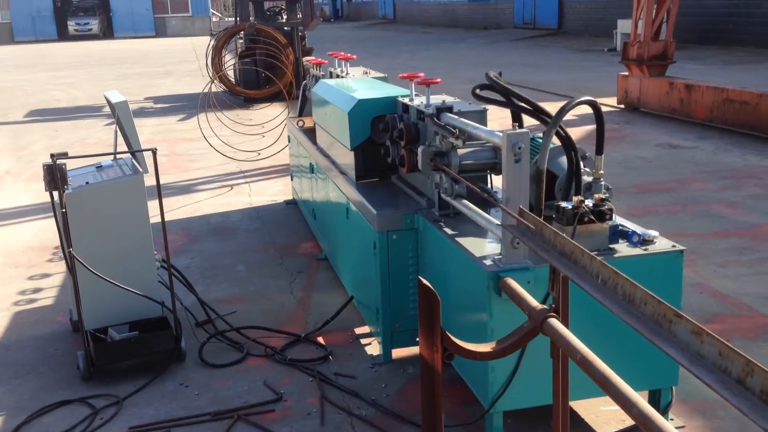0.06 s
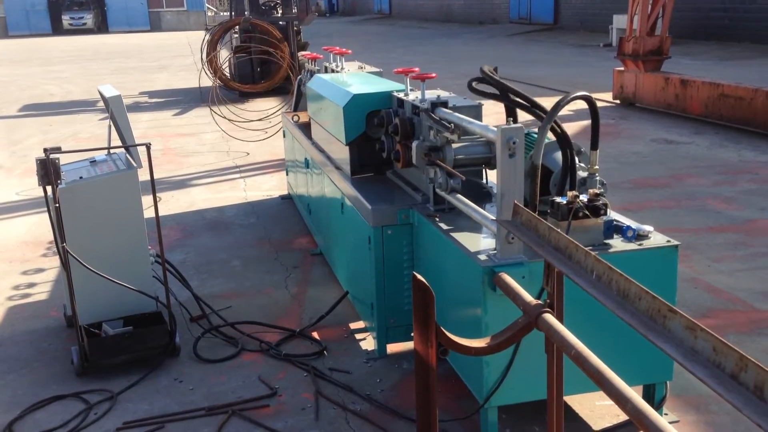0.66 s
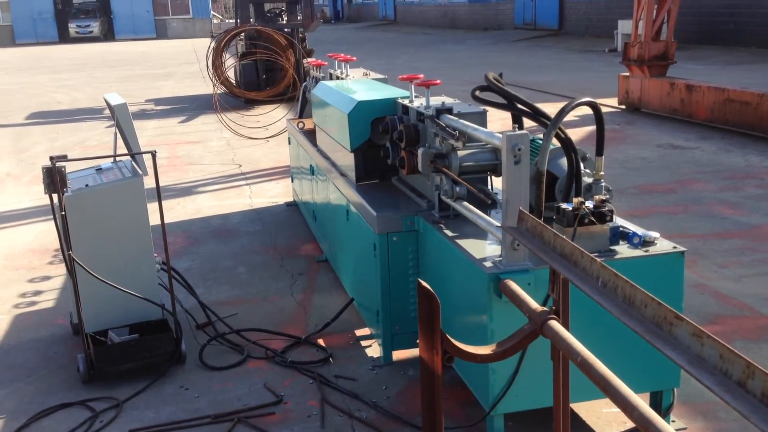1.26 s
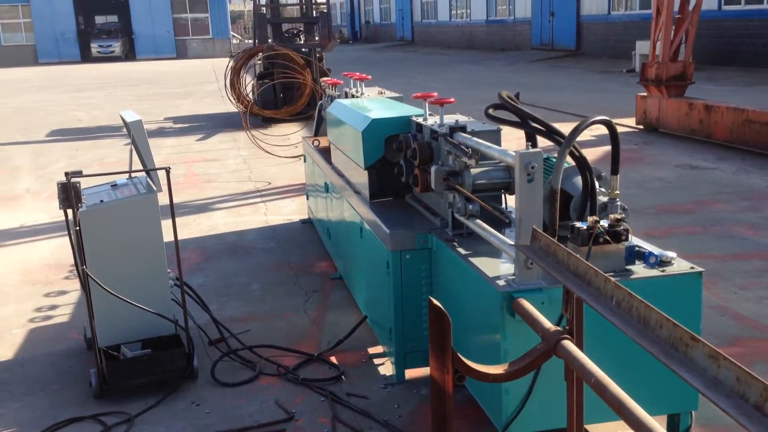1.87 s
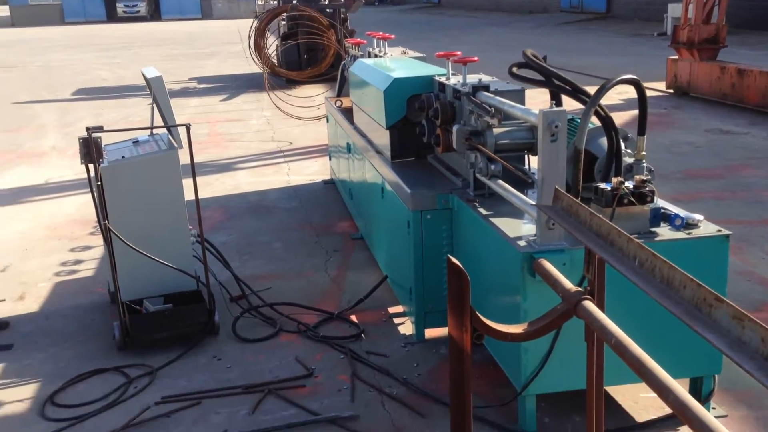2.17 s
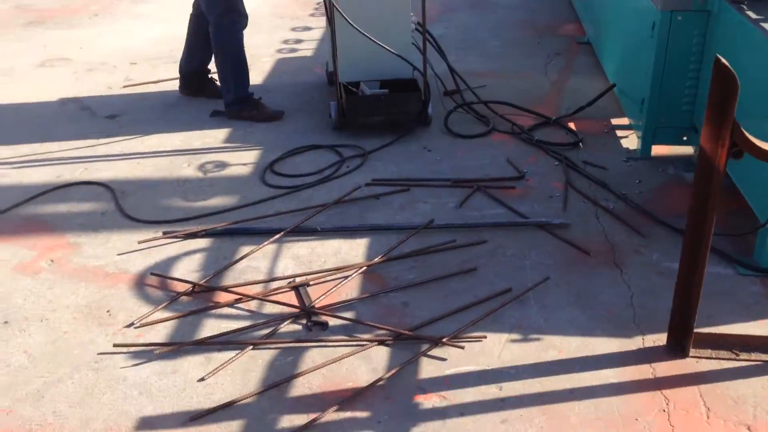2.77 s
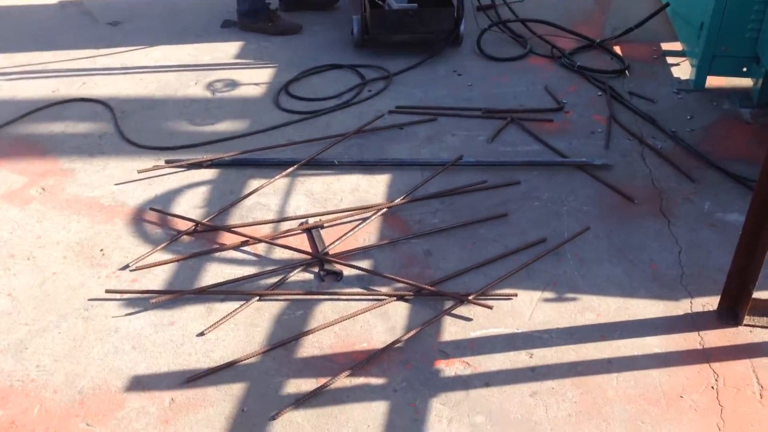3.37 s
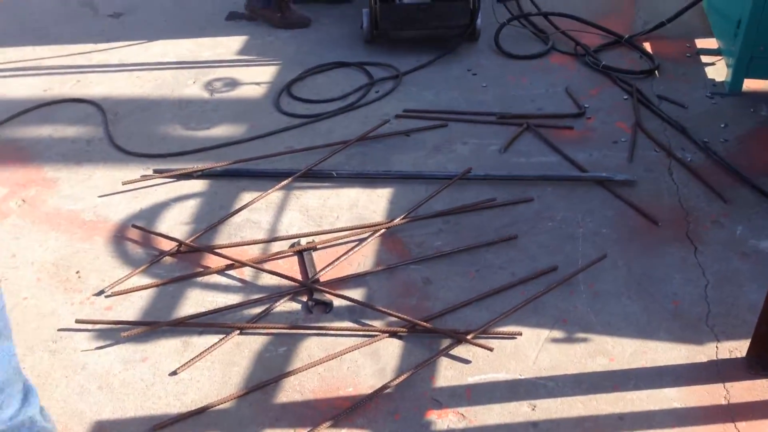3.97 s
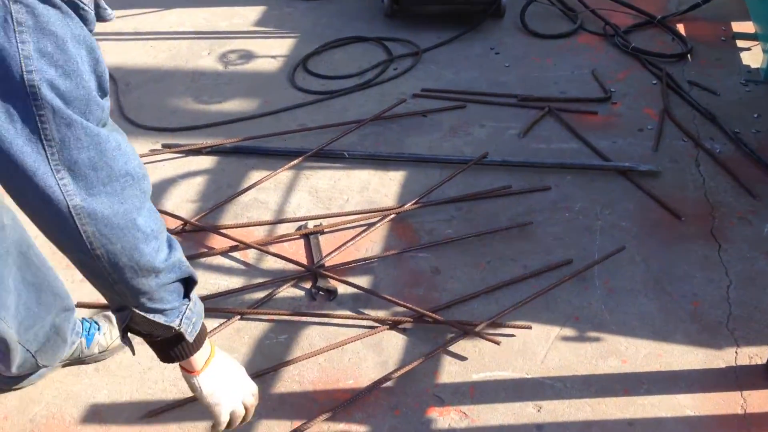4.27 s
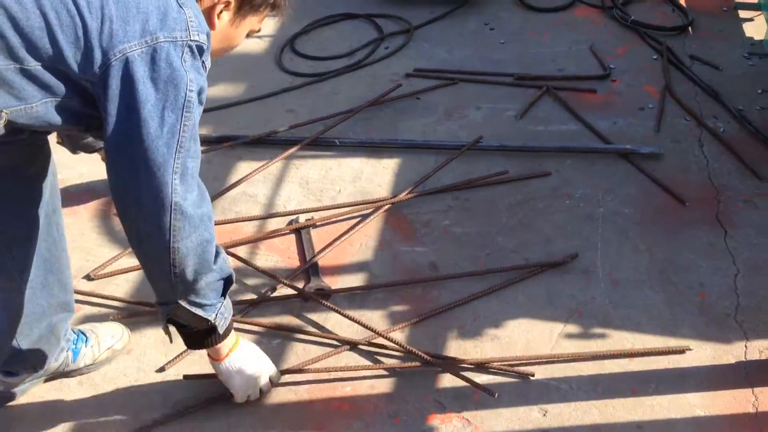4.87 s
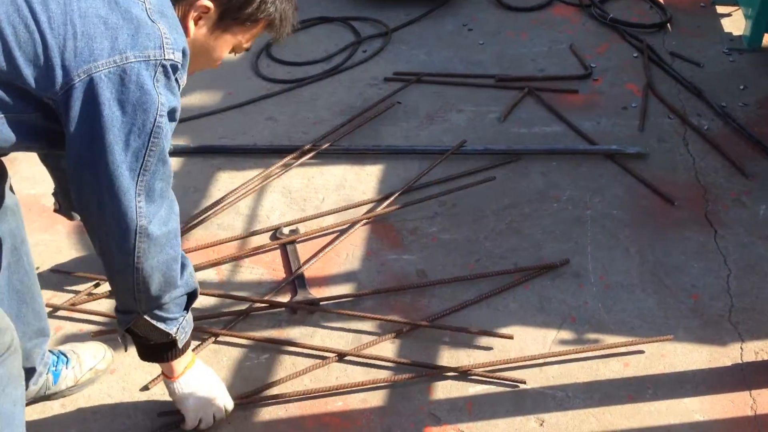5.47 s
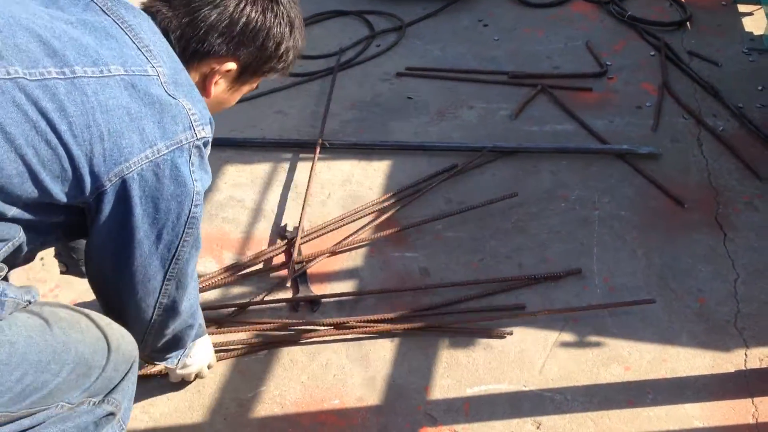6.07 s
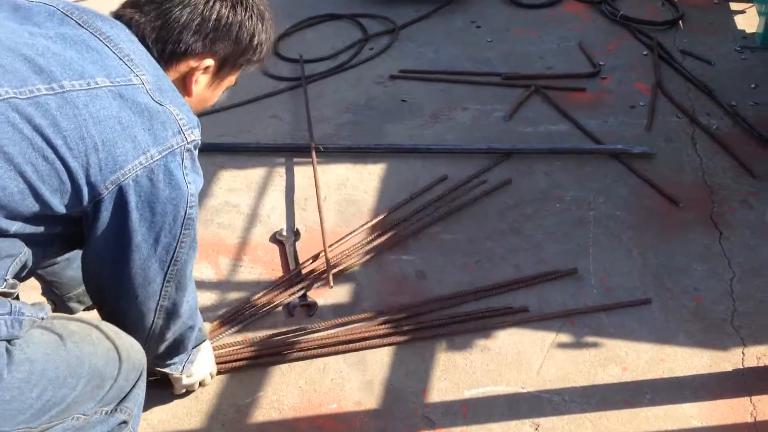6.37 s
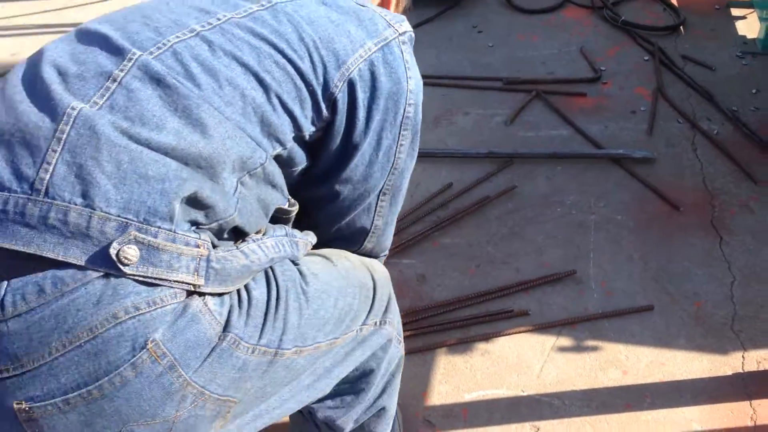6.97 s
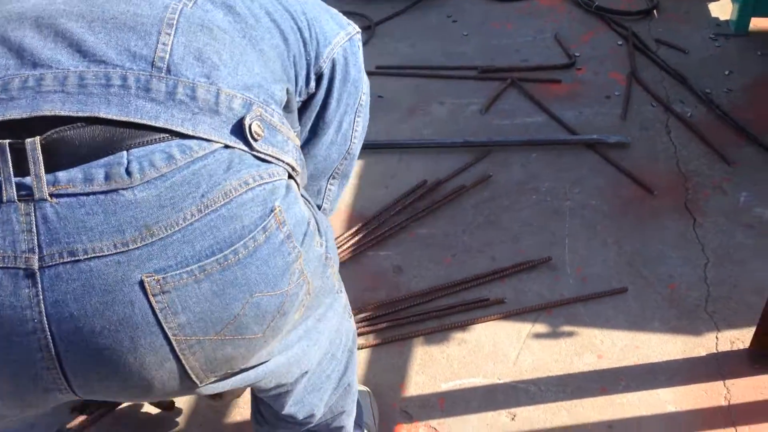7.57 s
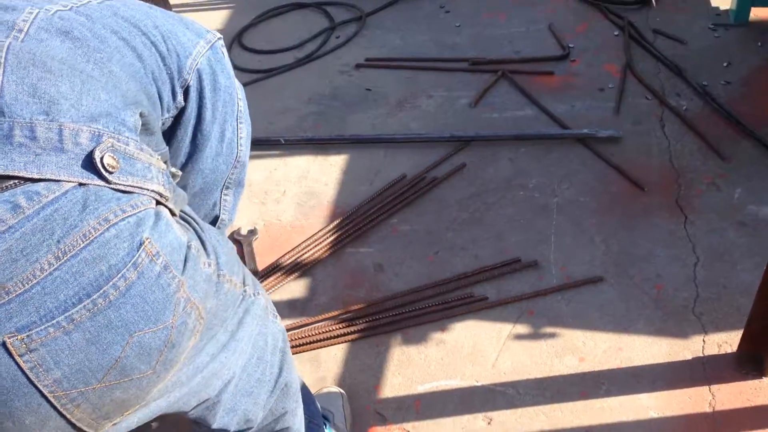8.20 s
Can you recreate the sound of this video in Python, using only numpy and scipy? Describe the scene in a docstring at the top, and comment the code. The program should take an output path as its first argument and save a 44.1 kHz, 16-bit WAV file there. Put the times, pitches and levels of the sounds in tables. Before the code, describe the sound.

A machine rattles steel wire through rollers and winds down, then metal rods clink, scrape and clatter on concrete amid wind gusts.

```python
"""An open concrete yard, one small microphone beside a rebar straightening and cutting machine.
Ribbed wire rattles in the rollers; after the cut the spinning head coasts to rest. The cut rod lands
and rolls, then a worker rakes the rods together and drops the bundle: every blow and every catch of
a rib rings the steel's bending modes. Shoes scuff on grit and gusts buffet the microphone.
Behind it all lie a low hum and the wash of distant works."""
import sys
import numpy as np
from scipy import signal
from scipy.fft import rfft, irfft
from scipy.io import wavfile
from scipy.ndimage import uniform_filter1d, map_coordinates

SR = 44100
rng = np.random.default_rng(int(sys.argv[2]) if len(sys.argv) > 2 else 0)


def waveform_to_disk(signal):
    """Save audio, clipped to [-1, 1], as 16-bit WAV at the path in sys.argv[1]."""
    frames = np.transpose(np.atleast_2d(signal))
    scaled = np.clip(frames, -1, 1) * 32767
    samples = np.round(scaled).astype(np.int16)
    wavfile.write(sys.argv[1], SR, samples)


N = 363384
TIME = np.arange(N) / SR
GRAZE_LEAD_S = .01  # a rod grazes this long before its main blow
FED, ROLLED, RAKED, DROPPED = range(4)  # how the steel lies
# moments from which the steel lies rolled, raked and dropped: t/s
POSITIONS_S = [3.3, 4.45, 7.3]


def amp(db):
    """Decibels to amplitude."""
    return 10 ** (np.asarray(db) / 20)


def unit(x):
    """Scale to rms 1."""
    return x / np.sqrt(np.mean(x ** 2) + 1e-20)


def curve(points):
    """Join (t/s, value) points by straight lines."""
    return np.interp(TIME, *np.transpose(points))


def add(track, s, sound):
    """Mix a sound in at time s."""
    start = max(int(s * SR), 0)
    track[start:start + len(sound)] += sound[:max(N - start, 0)]


def colour(x, points):
    """Shape a sound by (f/Hz, level/dB) points, falling off beyond both ends."""
    hz, db = np.transpose(points)
    f = np.maximum(np.fft.rfftfreq(len(x), 1 / SR), 1)
    skirts = np.minimum(f / hz[0], 1) ** 2 * np.minimum(hz[-1] / f, 1) ** 4
    return irfft(rfft(x) * skirts * amp(np.interp(np.log(f), np.log(hz), db)), len(x))


def resonate(x, hz, width):
    """One resonance, gain 1 at its centre."""
    return signal.lfilter(*signal.iirpeak(hz, max(hz / width, .5), fs=SR), x)


def split(x, hz, order=4):
    """The parts below and above a frequency."""
    return [signal.sosfilt(signal.butter(order, hz, side, fs=SR, output="sos"), x)
            for side in ("low", "high")]


def walk(rate):
    """Smooth random drift with a spread near 1 and `rate` new values a second."""
    step = int(SR / rate)
    return 1.2 * uniform_filter1d(np.repeat(rng.standard_normal(N // step + 1), step), step)[:N]


def contacts(size, rate, spread_db):
    """Tiny random impacts, `rate` a second; a wide spread makes a few much harder than the rest."""
    chance, force, hardness = rng.random(size), rng.standard_normal(size), rng.standard_normal(size)
    return (chance < rate / SR) * force * amp(spread_db * np.clip(hardness, -2, 2))


def steady(x, size=2000):
    """Hold the short-term rms at 1 and keep the fine grain."""
    return x / np.sqrt(np.abs(uniform_filter1d(x ** 2, size)) + 1e-12)


def swell(start, length, attack_s, release_db_per_s):
    """Attack, hold and release of one movement."""
    age = TIME - start
    return np.clip(age / attack_s, 0, 1) * amp(-release_db_per_s * np.maximum(age - length, 0))


def yard():
    """Distant works reach the microphone as a faint wavering wash."""
    # spectrum of the works: f/Hz, relative level/dB
    spectrum = [(18, -28), (30, -3.5), (75, 2.5), (307, -10), (518, -11.5), (656, -11), (874, -14),
                (1050, -15), (1910, -22.5), (6370, -31.5), (12900, -37), (15500, -38.5)]
    # their slow rise and fall: t/s, relative level/dB
    levels = [(0, -56.5), (2.6, -56), (4, -52), (5.3, -57), (6.6, -52.5), (8.24, -53.5)]
    wash = colour(rng.standard_normal(N), spectrum)
    above_rumble = split(wash, 300)[1]
    return wash / np.std(above_rumble) * amp(curve(levels) - 2.0 + 0.44 * walk(9))


def hum(hz=140, width=32):
    """A narrow band of noise hums low under everything."""
    # course of the hum: t/s, level/dB
    levels = [(0, -40), (1.5, -54), (2.6, -57), (4.2, -52), (5.2, -61), (8.24, -63)]
    band = resonate(resonate(rng.standard_normal(N), hz, width), hz, width)
    return amp(curve(levels)) * steady(band, size=8000)


def wind(breeze_db=-59.5, flutter_db=1.5):
    """Turbulence right on the microphone: stronger gusts are brighter, and single eddies thump."""
    # gusts: start t/s, length/s, relative level/dB
    gusts = [(1.922, 0.34, -49.5), (2.623, 0.074, -42), (2.695, 0.053, -35), (2.778, 0.097, -38),
             (3.046, 0.072, -37.5), (3.2, .1, -46.5), (3.386, 0.47, -46), (3.934, 0.31, -41.5),
             (4.523, .15, -37.5), (4.717, .16, -44.5), (4.935, .33, -42), (5.41, 0.092, -49),
             (5.77, 0.066, -42.5), (6.059, 0.552, -39.5), (7.219, 0.1, -42), (7.748, 0.084, -19.5),
             (7.85, 0.21, -28.5), (7.973, .2, -22.5), (8.12, 0.051, -18), (8.19, .05, -29)]
    # spectrum of the turbulence: f/Hz, relative level/dB
    spectrum = [(15, -50.5), (25, -11.5), (76, 4), (281, -3), (346, -7.5), (516, -6), (604, -8.5),
                (949, -24.5), (1230, -33.5), (1600, -35), (2080, -57), (3520, -120)]
    # eddies hitting the microphone: t/s, peak level/dB, half width/s
    eddies = [(2.727, -25.5, 0.00079), (2.811, -27, 0.0021), (2.851, -21.5, 0.0011), (2.866, -26, 0.00091),
              (3.11, -25, 0.001), (4.616, -22.5, 0.00073), (5.177, -20.5, 0.00083), (6.137, -25.5, 0.00066),
              (6.498, -28, 0.0019), (7.767, -14.5, 0.00041), (7.800, -4.5, 0.00039), (7.807, -7, 0.0006),
              (7.992, -10, 0.0007), (8.140, -15, 0.0018), (8.150, -23, 0.000082), (8.1525, -0.5, 0.00036)]
    swells = [amp(db) * swell(s, length, attack_s=0.015, release_db_per_s=499)
              for s, length, db in gusts]
    gust_db = 20 * np.log10(np.maximum(np.max(swells, axis=0), amp(breeze_db)))
    low, high = split(colour(rng.standard_normal(N), spectrum), 288, order=2)
    brightness = amp(np.minimum(0.75 * (gust_db + 10), 3))
    air = (low - brightness * high) * amp(6.9 * walk(70))
    out = steady(air) * amp(gust_db - 1.5 + flutter_db * walk(16))  # uneven puffs
    for s, db, half_width in eddies:
        passage = np.arange(-500, 500) / SR / half_width
        push_pull = -passage * np.exp((1 - passage ** 2) / 2)
        add(out, s - 500 / SR, amp(db) * push_pull)
    return split(out, 38, order=2)[1]  # slow pressure swings leak past the diaphragm


def shoes():
    """Grit crunches between sole and concrete in short swells."""
    # scuffs: t/s, half length/s, centre f/Hz, width/Hz, level/dB
    scuffs = [(2.503, 0.028, 915, 600, -54), (2.506, 0.02, 3180, 3000, -56.5),
              (3.262, 0.013, 1850, 250, -48), (5.994, 0.046, 810, 737, -42.5),
              (5.995, 0.027, 1830, 1300, -37), (6.151, .02, 3070, 2400, -32),
              (7.484, 0.028, 1760, 900, -38)]
    grit = contacts(N, rate=1800, spread_db=-3)
    out = np.zeros(N)
    for s, length, hz, width, db in scuffs:
        pressure = np.exp(-.5 * ((TIME - s) / length) ** 2)
        out += amp(db) * pressure * unit(resonate(resonate(grit, hz, width), hz, width))
    return out


def machine(spin_hz=87.3, cut_s=0.7, coast_s=1.9, loaded_db=-29, idle_s=1.6):
    """The spinning head beats the wire on its rollers; the knocks shake the frame and fade as it slows."""
    # the machine drops its load at the cut, then coasts to rest: t/s, relative level/dB
    run_down = [(0, -27.5), (.33, -26.5), (.62, -29), (.69, -35.5), (1.08, -35.5), (1.5, -40), (1.6, -46),
                (1.78, -44), (1.92, -57), (2.45, -75)]
    # resonances of the frame: f/Hz, width/Hz, relative level/dB
    frame_modes = [(141, 25, -0.5), (230, 63, 0.5), (312, 23, 4), (477, 72, -0.5), (598, 45, 2.5),
                   (695, 30, -2.5), (783, 45, -4.5), (1183, 50, -12), (1458, 33, -6.5), (1747, 280, -13.5)]
    # broad spectrum of the rumble: f/Hz, relative level/dB
    spectrum = [(18, -49), (30, -5.5), (135, 6.5), (177, 4.5), (472, 5), (510, 3), (764, -16), (944, -17.5),
                (1190, -11.5), (2780, -33), (3000, -17), (3900, -35.5), (6600, -120)]
    speed = spin_hz * np.exp(-np.maximum(TIME - cut_s, 0) / coast_s)
    turns = np.cumsum(speed * (1 + 0.011 * walk(31))) / SR
    knocks = contacts(N, rate=1600, spread_db=0) * (1 + 0.06 * np.cos(2 * np.pi * turns))
    frame = sum(amp(db) * resonate(knocks, hz, width) for hz, width, db in frame_modes)
    low, high = split(unit(colour(knocks, spectrum)) + amp(-3) * unit(frame), 1000)
    bass, rumble = split(low, 100)
    rumble_db = curve(run_down)
    fall_db = loaded_db - rumble_db
    idle_db = 59 * np.maximum(TIME - idle_s, 0)  # the rollers fall silent as the wire stops
    rollers = amp(-2.5 - .2 * fall_db - idle_db) * steady(high)
    shake = amp(-15 + .55 * fall_db) * steady(bass, size=6000)  # bass fades more slowly than the rumble
    running = np.clip((run_down[-1][0] - TIME) / .06, 0, 1)
    return running * amp(rumble_db - 1.5) * (shake + steady(rumble) + rollers)


def ring(hz, gain, t60, size=32768):
    """Impulse response of decaying modes; t60 holds at 5 kHz and higher modes die sooner."""
    t = np.arange(size, dtype=np.float32) / SR
    out = np.zeros(size)
    for f, g in zip(hz, gain):
        fade = float(np.log(1000) / t60 * (f / 5000) ** 0.22)
        phase = float(2 * np.pi * rng.random())
        out += g * np.exp(-fade * t) * np.sin(float(2 * np.pi * f) * t + phase)
    return out


def heap(t60, clack_db, length_spread, clack_s=0.021, count=6):
    """One response for each rod, damped by what it lies on: paired bending modes and a dry clack."""
    # spectrum the steel radiates: f/Hz, relative level/dB
    spectrum = [(590, -60.5), (1000, -34), (1990, -14), (2160, -11), (2390, -10.5), (2590, -12),
                (2840, -9.5), (4010, -1), (5920, -4.5), (13500, -19.5), (15500, -24.5)]
    order = np.arange(6, 30) + .5
    bending_hz = 19.7 * order ** 2 / np.sqrt(1 + .000225 * order ** 2)
    bodies = []
    for stretch in 1 + length_spread * np.linspace(-1, 1, count):
        # the ribs split each mode in two; the point of contact weights them
        hz = np.repeat(bending_hz * stretch, 2) * (1 + .003 * rng.standard_normal(2 * len(order)))
        weights = np.sqrt(hz) * np.sin(np.pi * rng.random(len(hz)))
        modes = ring(hz, weights, t60, size=16384)
        noise = split(rng.standard_normal(len(modes)), 8500, order=2)[0]
        clack = noise * np.exp(-np.arange(len(modes)) / SR / clack_s)
        body = np.pad(unit(modes) + amp(clack_db) * unit(clack), (32, 16352))
        bodies.append(unit(colour(body, spectrum)))
    return np.array(bodies)


def free_ring(modes, t60):
    """Rods touching at a few points only ring on in clear lines."""
    hz, db = np.transpose(modes)
    return unit(ring(hz, amp(db), t60))


def effort(position, attack_s=.02):
    """Body and treble envelopes of the strokes in one position; a faint ring outlasts each stroke."""
    # steel sliding through the rollers or over concrete:
    # start t/s, length/s, relative level/dB, slope/(dB/s), treble re level/dB
    strokes = [(0, 0.1, -31.5, 4, -12.5), (0.111, .41, -21.5, -16, -7.5), (0.574, .21, -23.5, -36.5, -9.5),
               (0.805, 0.5, -27, -23.5, -12), (1.348, .23, -35.5, -85, -25), (2.228, 0.31, -68, -2, -10),
               (3.401, 0.085, -38, 2, -3), (3.428, .1, -22.5, -100, -5.5), (3.559, 0.084, -32, 5, -2.5),
               (3.63, 0.49, -26, -35.5, -6), (4.02, 0.095, -30, -24, -2), (4.194, 0.38, -49, 2, -12),
               (4.565, 0.096, -28, -80, -8), (4.691, .38, -28.5, -6, -8.5), (5.327, .03, -37.5, 0, -12),
               (5.352, 0.33, -23, -115, -12), (5.677, .1, -37.5, 6, -9), (5.751, .6, -29.5, -4.5, -10),
               (6.383, .27, -28.5, -6.5, -6), (6.85, .1, -62, -50, -14), (7.368, 0.12, -27, -14, -14),
               (7.497, 0.085, -26, 36, -8), (7.6, 0.4, -22, -120, -11), (7.859, .1, -30, -73, -10)]
    body, treble = np.zeros(N), np.zeros(N)
    for start, length, db, db_per_s, treble_db in strokes:
        if np.searchsorted(POSITIONS_S, start) == position:
            pressure = amp(db + db_per_s * np.clip(TIME - start, 0, length))
            moving = swell(start, length, attack_s, release_db_per_s=208.5)
            ringing = amp(-16) * swell(start, length, attack_s, release_db_per_s=81.5)
            stroke = pressure * np.maximum(moving, ringing)
            body, treble = np.maximum(body, stroke), np.maximum(treble, amp(treble_db) * stroke)
    return body, treble


def slide(position, bodies, free, gain_db, rate, spread_db, handover_db, waver=.003):
    """Ribs catch and slip, each catch ringing the steel; the load shifts from rod to rod."""
    catches = [contacts(N, rate, spread_db) * amp(handover_db * walk(22)) for _ in bodies]
    sound = sum(signal.oaconvolve(force, body + free)[:N] for force, body in zip(catches, bodies))
    # the points of support move along the rods and bend their pitch a little
    warped_samples = np.arange(N) + np.cumsum(waver * walk(7.6))
    sound = map_coordinates(sound, [warped_samples], order=3, mode="mirror")
    low, high = (steady(part, size=3000) for part in split(sound, 8000))
    body, treble = effort(position)
    return amp(gain_db) * (body * low + treble * high)


def clank(db, treble_db, bright_hz, chatter_s, body, graze_s=0.0019, size=6000):
    """A rod slaps down along its length: a graze, the main blow, then a fading chatter of contacts."""
    t = np.arange(size) / SR - GRAZE_LEAD_S
    envelope = np.exp(-np.abs(t) / np.where(t < 0, graze_s, chatter_s))
    blows = contacts(size, rate=3500, spread_db=4.0) * envelope
    blows[int(GRAZE_LEAD_S * SR)] += 2.0  # the main blow
    # a rod that cannot bounce is pressed against the others, so its ring dies quickly too
    held = np.exp(-np.arange(len(body)) / SR / (7.8 * chatter_s))
    sound = signal.fftconvolve(blows, body * held)
    low, high = split(sound + 0.38 * resonate(sound, bright_hz, width=1300), 8000)
    low_peak, high_peak = (np.sqrt(uniform_filter1d(part ** 2, size=200).max()) for part in (low, high))
    return amp(db) * (low / low_peak + amp(treble_db) * high / high_peak)


def singing_rod(drop_s=7.37):
    """When the bundle lands, one rod lies free and sings on."""
    # its modes: f/Hz, level/dB, t60/s
    modes = [(1104, -46.5, 1.65), (1456, -46, .9), (2160, -49, 1.5), (4570, -46.5, .9), (9636, -60, 4)]
    t = np.arange(SR) / SR
    out = np.zeros(N)
    for hz, db, t60 in modes:
        add(out, drop_s, amp(db) * np.exp(-np.log(1000) * t / t60) * np.sin(2 * np.pi * hz * t))
    return out


def rods(clank_gain_db=-9.5, clank_hz=5720, spread_octaves=0.11):
    """In the foreground the steel is fed, rolls, is raked and dropped; sliding and blows ring it."""
    # clearest modes of the wire in the rollers: f/Hz, relative level/dB
    wire_modes = [(3585, -39.5), (4064, -49.5), (4630, -55.5), (5195, -40.5), (5814, -32.5), (6503, -51),
                  (6616, -48.5), (7106, -55.5), (7892, -57.5), (8059, -55), (8624, -57.5), (8823, -48),
                  (9270, -49.5), (9329, -52.5), (9426, -49), (9620, -43.5), (10239, -54.5), (11068, -38.5),
                  (11924, -44), (12828, -52), (13081, -49.5), (13744, -47.5)]
    # of the rod rolling on concrete: f/Hz, relative level/dB
    rod_modes = [(1427, -55.5), (1760, -53.5), (2164, -47.5), (2589, -36.5), (3047, -39.5), (3461, -40),
                 (4016, -67), (4107, -43.5), (4549, -60), (5286, -62), (5879, -71), (6438, -41),
                 (6557, -52), (7133, -57), (7257, -53), (7978, -44), (8603, -54), (8764, -49), (9345, -57),
                 (9566, -47), (10379, -50), (10933, -52), (11246, -51), (11876, -55.5), (12107, -49),
                 (12758, -53), (13022, -52), (13625, -57), (13954, -69), (14594, -76), (14917, -64)]
    # of the raked rods: f/Hz, relative level/dB
    raked_modes = [(2686, -56.5), (3558, -54), (3903, -44.5), (4479, -83), (4608, -49.5), (5270, -44),
                   (5787, -37.5), (6094, -44.5), (6476, -60), (7058, -60), (7375, -50.5), (7913, -49.5),
                   (8689, -58), (9238, -57), (9469, -72.5), (10061, -50.5), (10890, -54), (11133, -69),
                   (11730, -50.5), (11978, -65), (12586, -64.5), (12909, -69), (13507, -60), (13733, -55.5)]
    # of the dropped bundle: f/Hz, relative level/dB
    bundle_modes = [(1771, -47.5), (2169, -58.5), (2665, -50.5), (3074, -42), (3644, -40), (4107, -43),
                    (4570, -35), (4689, -23.5), (5179, -34), (5308, -35), (5766, -43), (5884, -33),
                    (6465, -42), (6724, -33), (7267, -40.5), (8000, -43), (8753, -38), (8969, -45),
                    (9437, -46), (9539, -50), (10266, -42.5), (11203, -39), (12188, -56), (12365, -53),
                    (13114, -40.5), (13711, -59.5), (14013, -55), (14632, -47)]
    # steel striking steel or concrete:
    # t/s, relative level/dB, treble re level/dB, chatter decay/s, relative free ring/dB
    blows = [(.0884, -7, -2.5, 0.014, -8), (.289, -20, 9.5, 0.05, 1), (.3326, -8.5, -4, 0.019, -6),
             (.4234, -21.5, 5.5, 0.011, -6), (.6145, -12.5, 7, .008, -6), (.6348, -14, 4, .018, -3),
             (.6445, -7.5, -16, 0.0051, 0), (.8295, -12, -3.5, .009, -10), (.9504, -19, -8, .022, -6),
             (1.0296, -20.5, -2.5, .012, 1), (1.2036, -27, -22, 0.0092, -2), (1.2708, -24, -13, 0.0069, -4),
             (1.3678, -23.5, -10, 0.029, -9), (1.6641, -44, -24, 0.0097, -4), (2.0707, -58, 5, 0.0088, -1),
             (2.152, -44.5, -22, .006, -4.5), (2.2563, -40.5, -22, 0.0046, -8), (2.276, -47, -14, .006, -6),
             (2.357, -45, -12, 0.0052, -3), (2.4126, -45.5, -25, 0.0083, -5),
             (2.796, -19, -9.5, 0.016, -10), (2.81, -15.5, -0.5, 0.0068, -8),
             (2.8213, -18.5, -13, 0.017, -18), (3.1658, -37.5, -10, 0.0087, -6.5),
             (3.3938, -30.5, -0.5, 0.013, -3), (3.453, -20.5, 4, 0.011, -3), (3.6374, -19, 4.5, 0.01, -13),
             (4.2915, -37.5, -4, .014, -4), (4.3946, -23.5, -28, 0.0053, -9),
             (4.412, -26.5, -25, 0.0027, -12), (4.5168, -13, -21, .016, -12), (4.582, -10, -11.5, .01, -3),
             (4.712, -17, -12, 0.024, 8), (4.7599, -18.5, 12, 0.012, -9), (4.7828, -10.5, -3, 0.015, -9),
             (4.8803, -14, -11, 0.0092, 10), (4.9425, -15.5, -1.5, 0.023, -7), (5.019, -17, -22, 0.013, 1),
             (5.1344, -26.5, -8, 0.01, -16), (5.278, -42.5, -20, .007, -10), (5.3617, -13, -14, 0.043, 9),
             (5.654, -30, -14, 0.0099, -27), (5.8712, -10.5, -29, 0.012, 5),
             (5.9095, -15.5, -25, 0.005, -4), (6.2039, -5, -21, 0.0036, 11), (6.2179, -11.5, -28, .004, -4),
             (6.3797, -12, -4, 0.01, -23), (6.4767, -14, -8, 0.011, 7), (6.5407, -10.5, -24, 0.0037, 12),
             (6.592, -10, -7, 0.036, -5), (6.8186, -34, -14, 0.0034, -19), (7.2145, -46, -13.5, 0.0049, -6),
             (7.369, -8, -15.5, 0.013, -0.5), (7.4998, -12, 2.5, 0.016, -10), (7.5641, -8.5, 3, 0.012, -1),
             (7.5853, -8, -22, 0.016, 1), (7.878, -16.5, -4.5, 0.027, -9)]
    wire, rod = free_ring(wire_modes, t60=0.36), free_ring(rod_modes, t60=0.075)
    raked, bundle = free_ring(raked_modes, t60=0.11), free_ring(bundle_modes, t60=0.28)
    gripped = heap(t60=.1, clack_db=-4, length_spread=.018)
    loose = heap(t60=.18, clack_db=-13, length_spread=.012)
    crowded = heap(t60=.13, clack_db=-7, length_spread=.025)
    out = slide(FED, gripped, amp(-12) * wire, gain_db=0.5, rate=300, spread_db=2, handover_db=0)
    out += slide(ROLLED, loose, amp(-5) * rod, gain_db=-1, rate=120, spread_db=1.5, handover_db=1)
    out += slide(RAKED, crowded, amp(-8) * raked, gain_db=0.5, rate=130, spread_db=1, handover_db=2.5)
    out += slide(DROPPED, loose, amp(-10.5) * bundle,
                 gain_db=-1.5, rate=290, spread_db=4, handover_db=-1.5)
    responses = {FED: (gripped, amp(-8.5) * wire), ROLLED: (loose, amp(1.5) * rod),
                 RAKED: (crowded, amp(3.5) * raked), DROPPED: (crowded, amp(3) * bundle)}
    for s, db, treble_db, chatter_s, ring_db in blows:
        bodies, free = responses[np.searchsorted(POSITIONS_S, s)]
        # each blow meets the rods differently; its brightest region shifts with the point of contact
        struck = unit(rng.standard_normal(len(bodies)) @ bodies) + amp(ring_db) * free
        bright_hz = clank_hz * 2 ** (spread_octaves * rng.uniform(-2, 2))
        add(out, s - GRAZE_LEAD_S, clank(db + clank_gain_db, treble_db, bright_hz, chatter_s, struck))
    return out


def scene():
    """Everything in the yard as it meets the one microphone."""
    return (machine() + rods() + singing_rod() + shoes() + wind() + hum() + yard())[None]


def record(dry, ceiling=0.66, top_hz=15350):
    """The small microphone loses deep bass and overloads in the hardest gust; the recorder cuts the top."""
    thin = split(dry, 26, order=2)[1]
    rounded = thin / (1 + (thin / ceiling) ** 6) ** (1 / 6)
    return signal.sosfilt(signal.ellip(10, .2, 80, top_hz, fs=SR, output="sos"), rounded)


dry = scene()
out = record(dry)
waveform_to_disk(out)
```